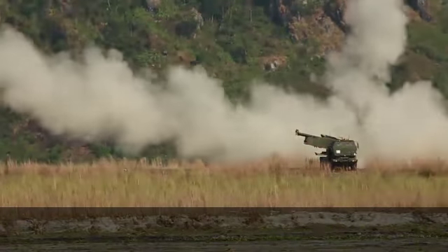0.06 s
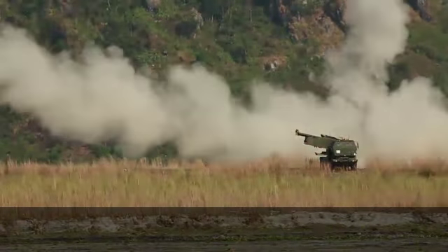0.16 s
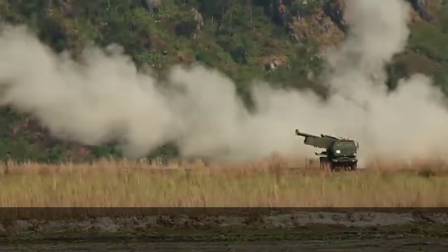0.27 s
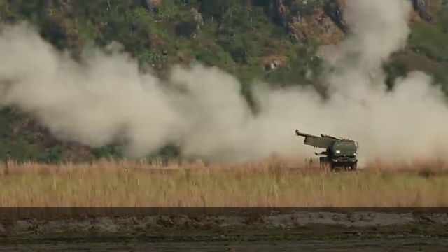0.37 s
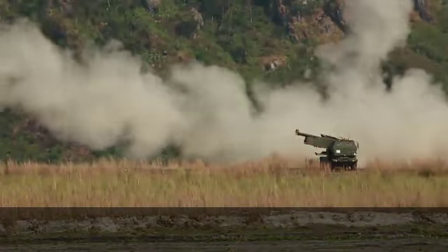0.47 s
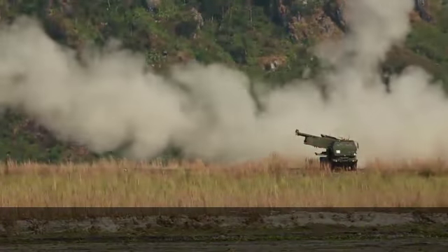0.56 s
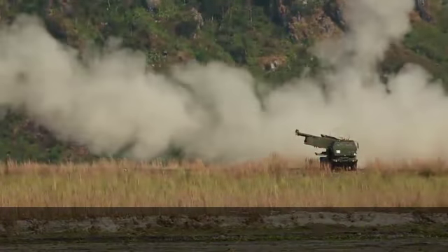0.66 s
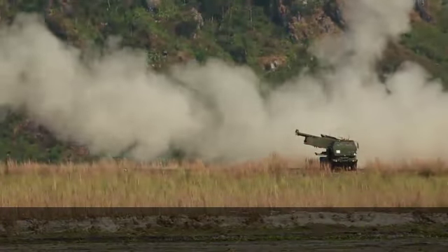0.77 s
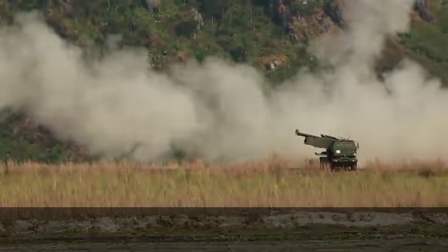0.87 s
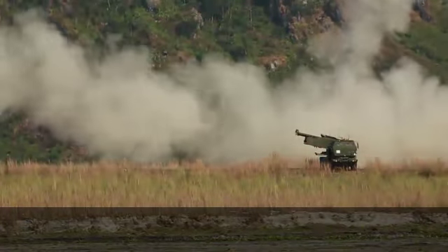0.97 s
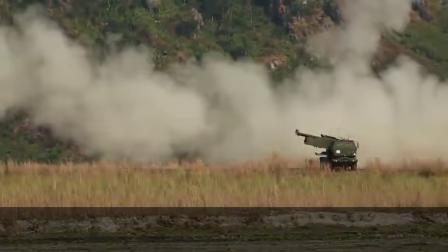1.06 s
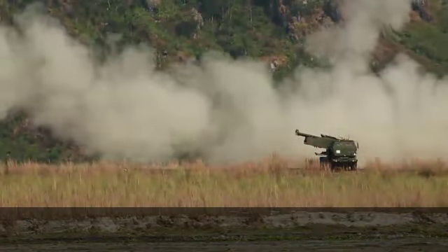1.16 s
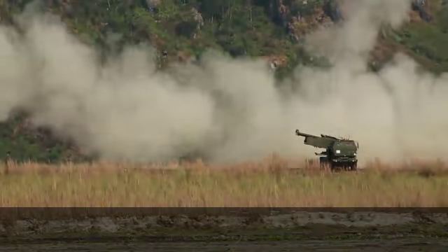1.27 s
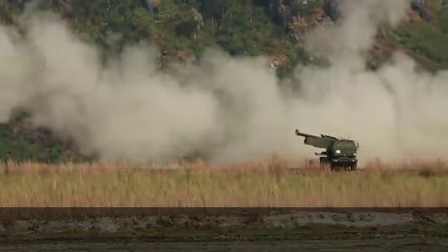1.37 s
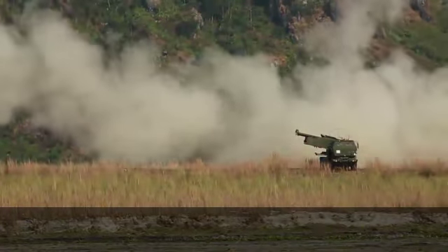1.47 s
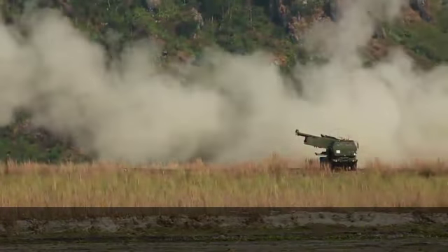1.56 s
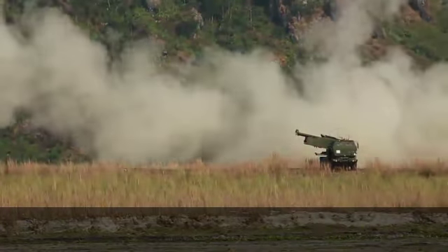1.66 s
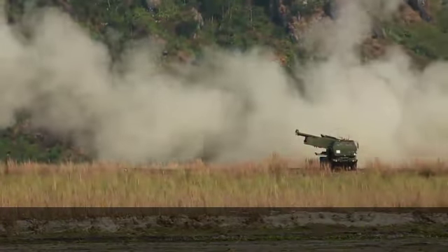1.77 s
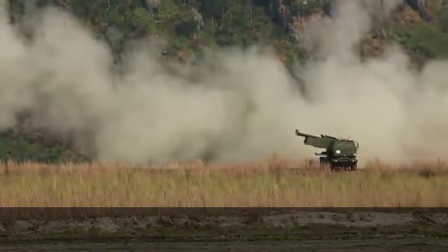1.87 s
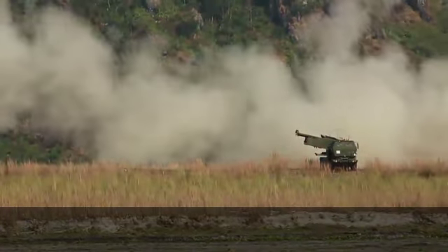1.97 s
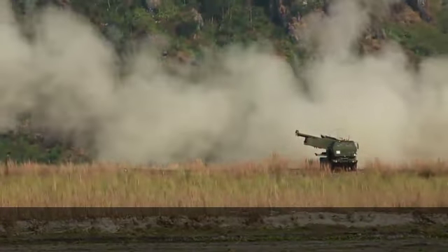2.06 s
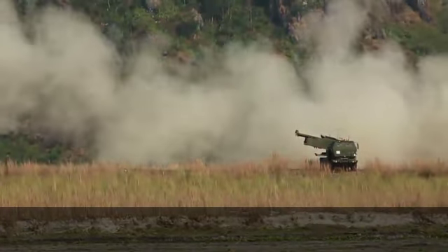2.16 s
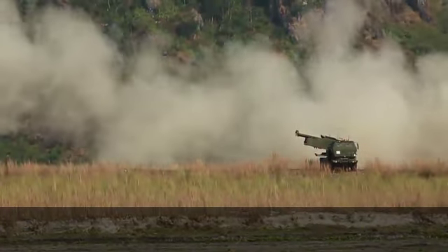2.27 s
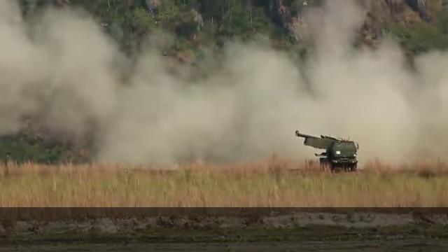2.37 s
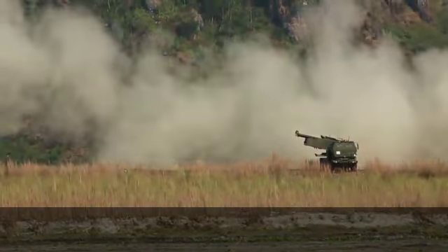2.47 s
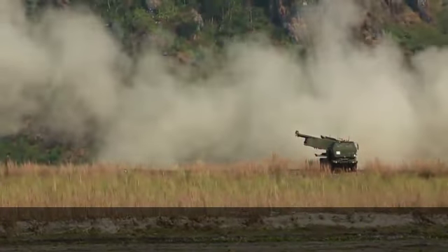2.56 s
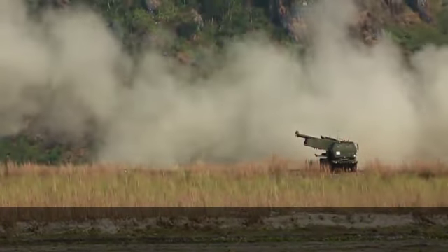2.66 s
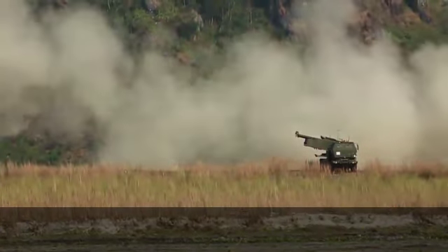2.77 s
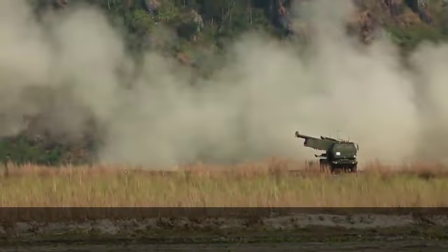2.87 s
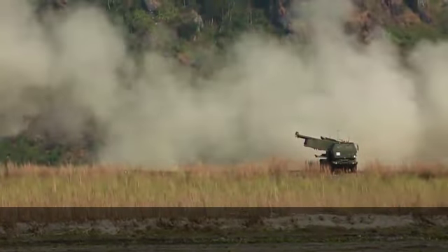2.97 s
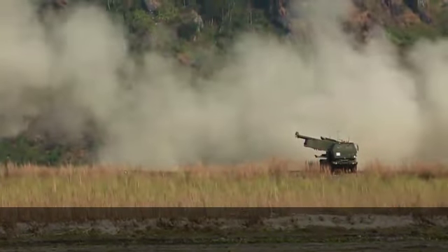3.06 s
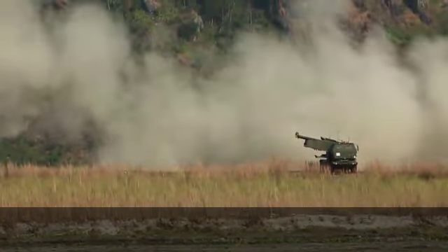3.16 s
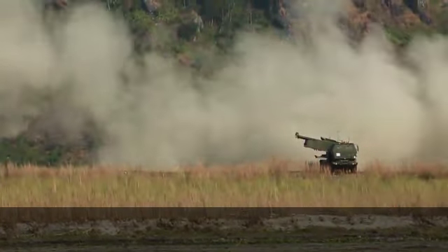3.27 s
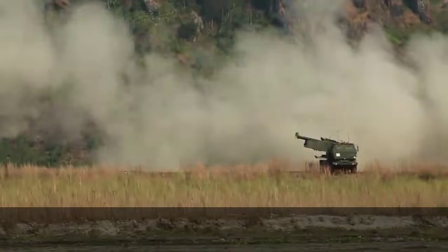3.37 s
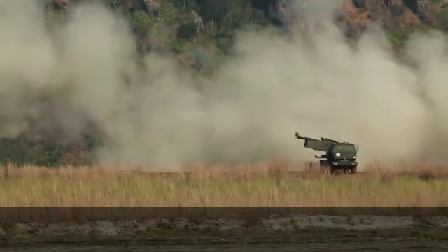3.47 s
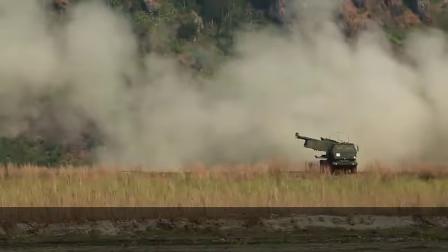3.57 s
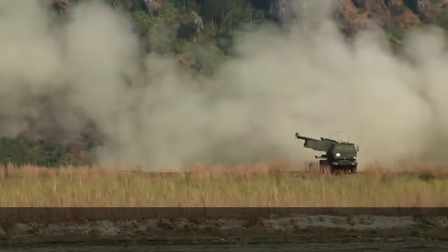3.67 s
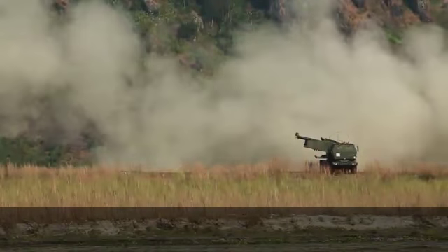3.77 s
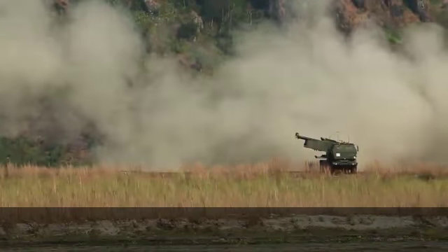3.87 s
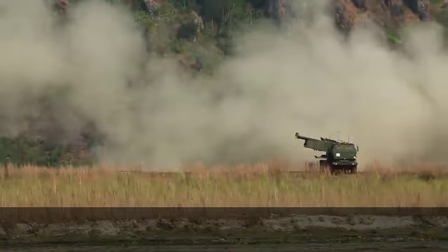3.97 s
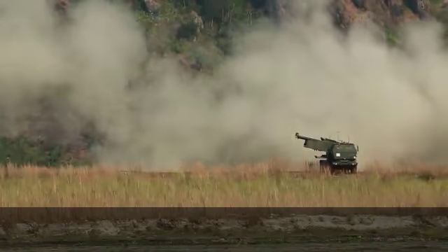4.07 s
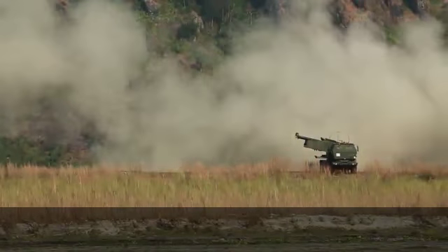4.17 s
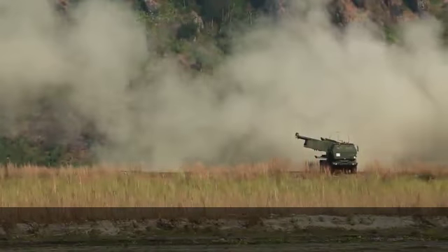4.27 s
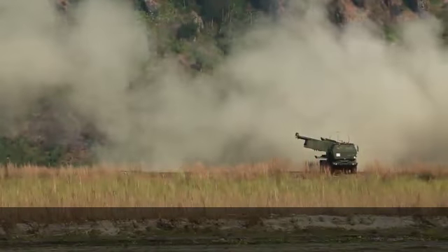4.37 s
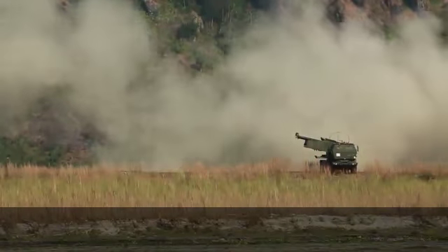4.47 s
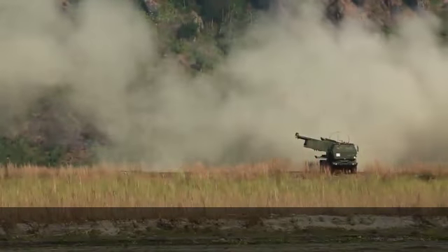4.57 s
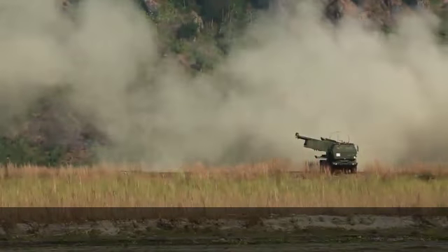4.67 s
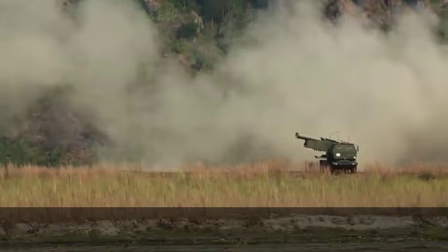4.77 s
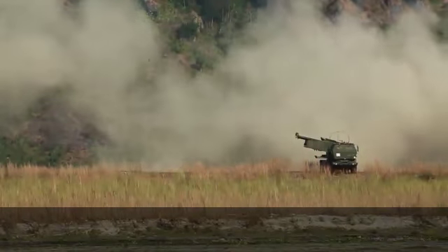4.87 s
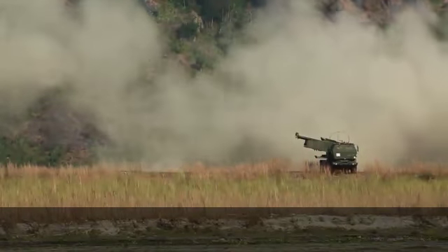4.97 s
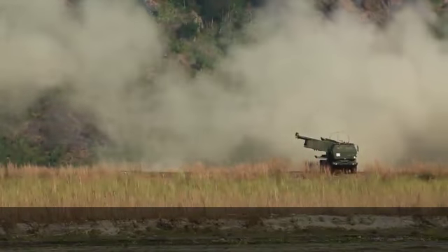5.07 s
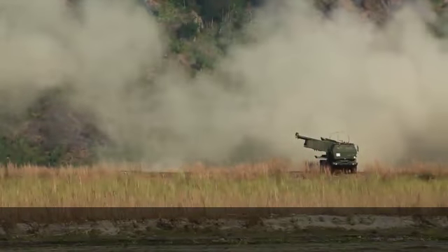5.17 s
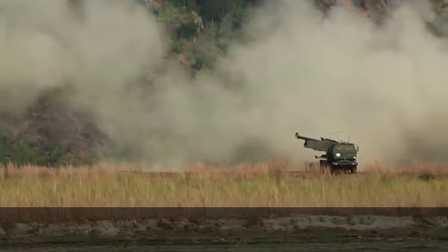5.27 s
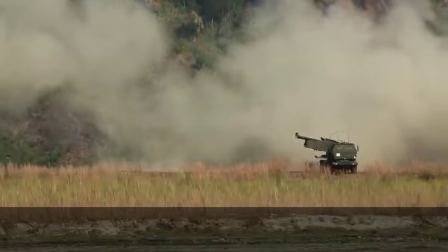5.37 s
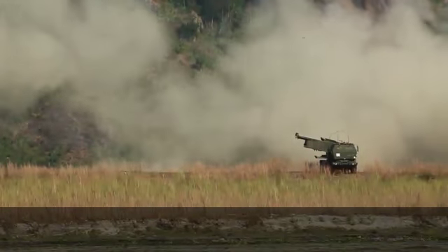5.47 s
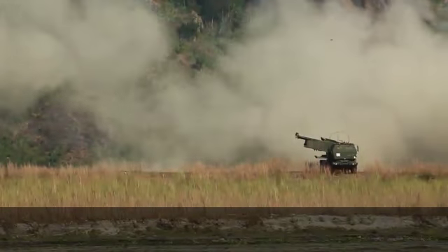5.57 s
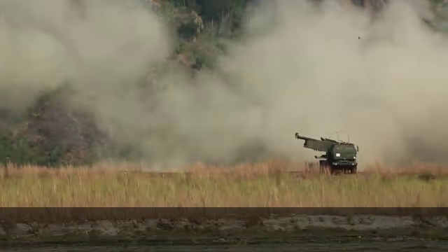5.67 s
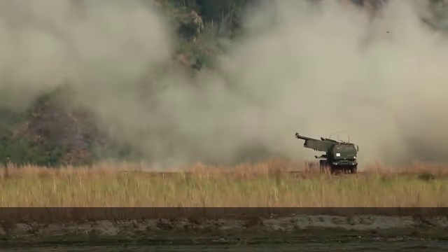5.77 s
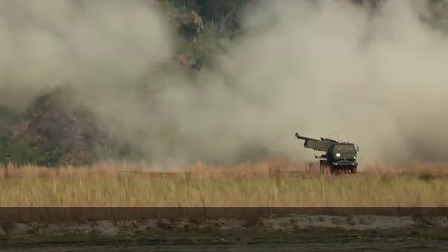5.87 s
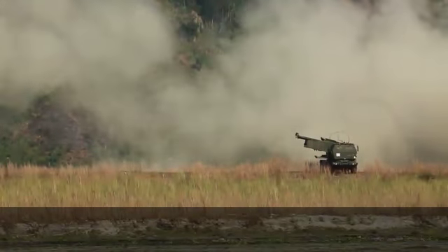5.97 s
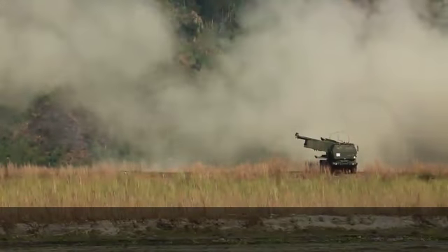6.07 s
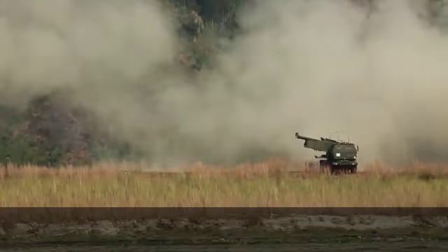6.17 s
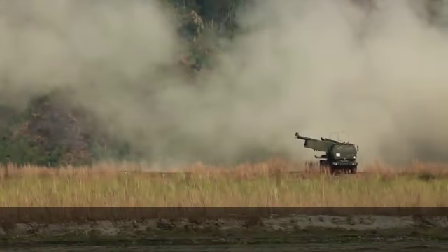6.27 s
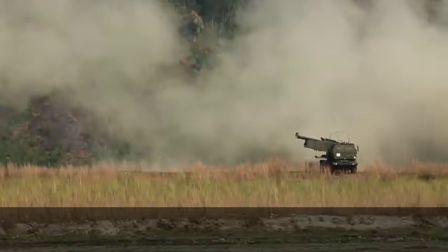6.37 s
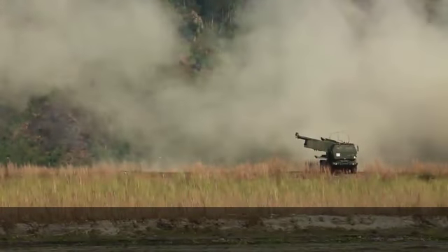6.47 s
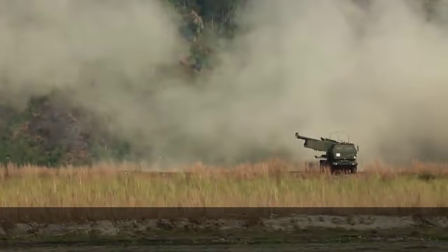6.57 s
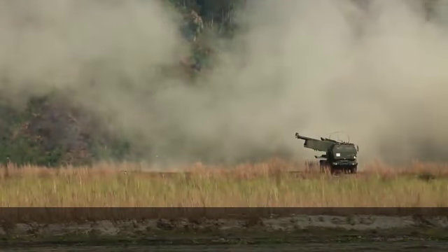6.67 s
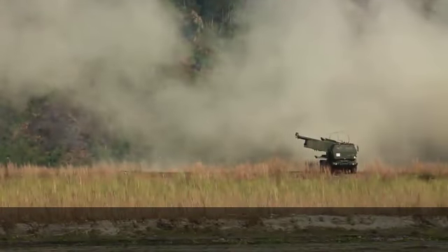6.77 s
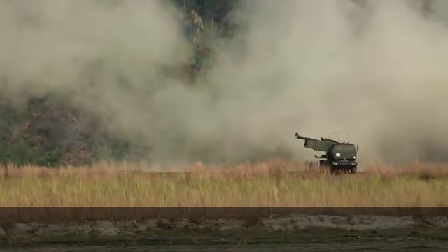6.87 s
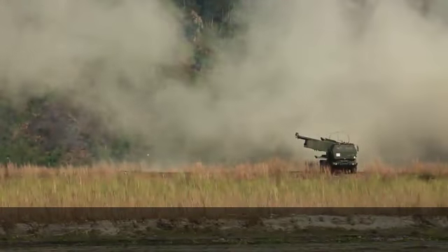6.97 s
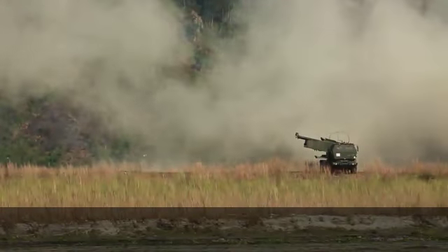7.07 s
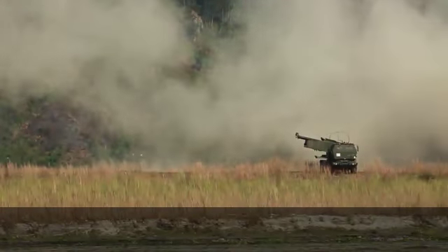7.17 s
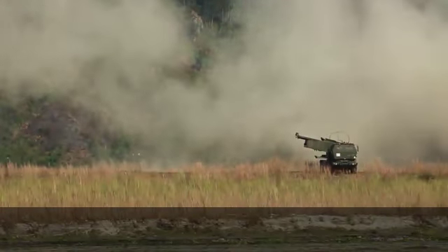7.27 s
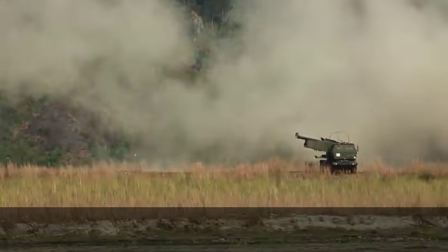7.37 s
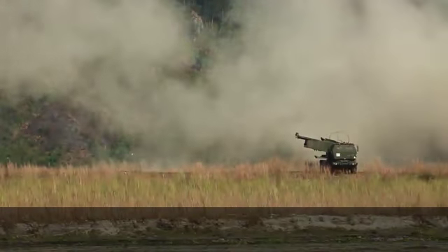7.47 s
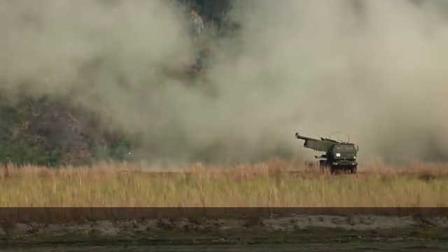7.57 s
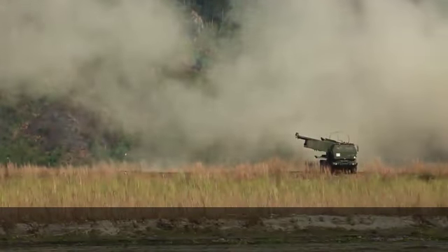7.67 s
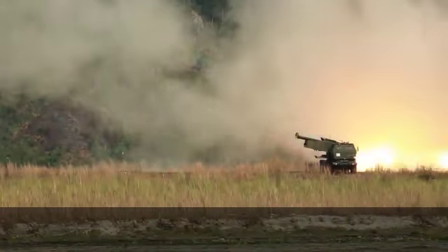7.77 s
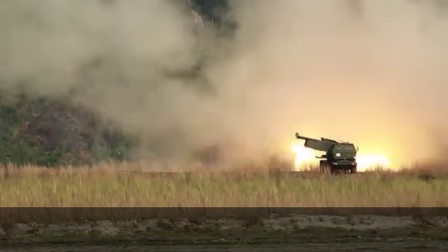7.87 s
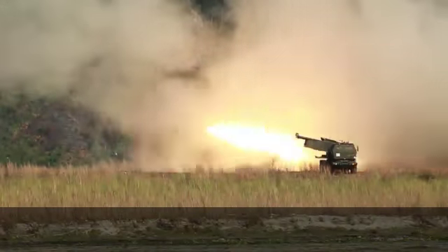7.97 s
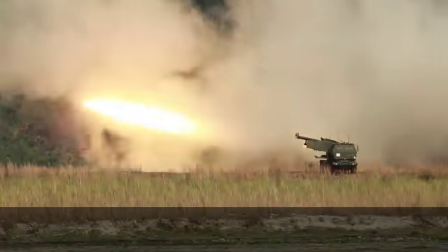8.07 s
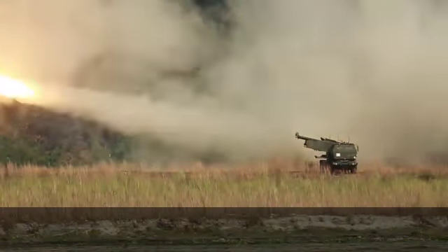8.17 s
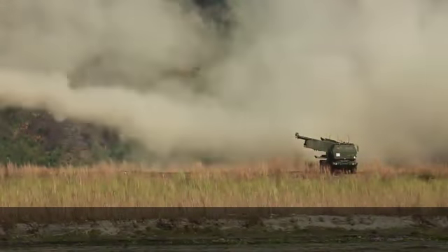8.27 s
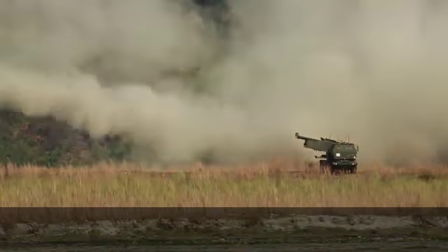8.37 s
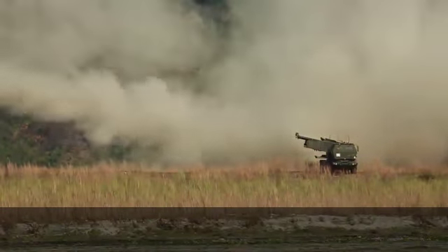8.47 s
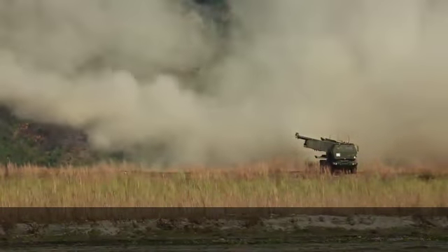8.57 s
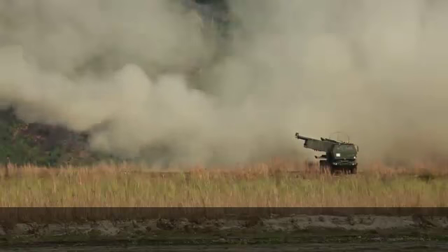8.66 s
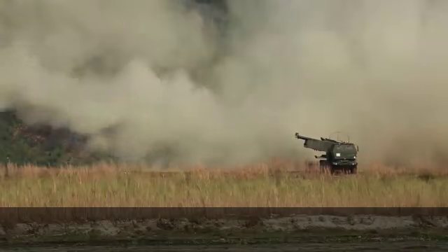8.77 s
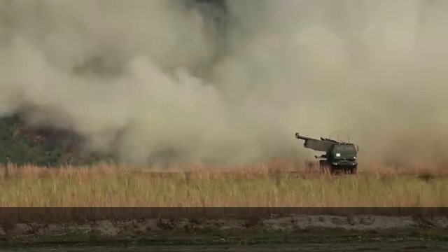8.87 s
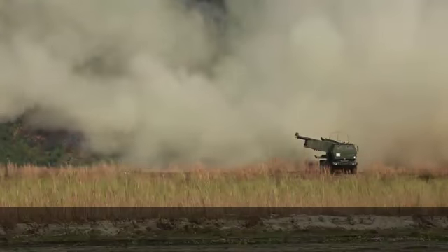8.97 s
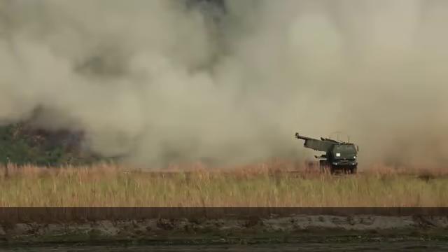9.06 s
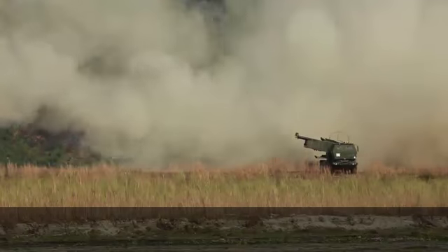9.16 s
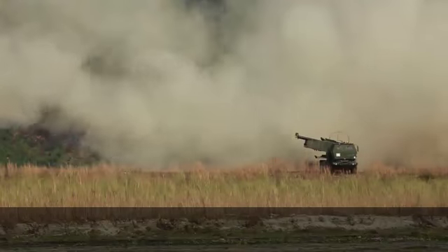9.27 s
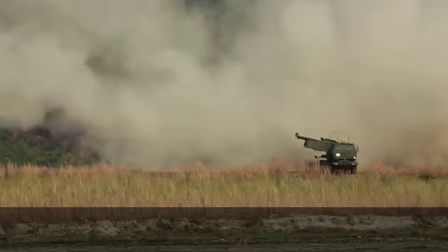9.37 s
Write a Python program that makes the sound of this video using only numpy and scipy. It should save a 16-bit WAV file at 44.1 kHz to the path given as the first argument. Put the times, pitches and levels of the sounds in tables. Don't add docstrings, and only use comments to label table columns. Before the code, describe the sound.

An open grass field, heard in mono at some distance from a truck-mounted rocket launcher. At 0 seconds a rocket is already roaring, broad, harsh and saturating the microphone, with deep rumble and a short ground echo. Its bright tearing tone lowers quickly over the first half second. From about 1.2 it weakens in jerks, with crackling peals; after 1.7 it turns duller and more distant, swelling in gusts until around 4, gone by about 5.3. Tiny high falling bird chips appear from 3.2 to 7.5, very faint. From 4.5 to 8.6 a far diesel idles softly, with irregular dry panel rattles, the strongest near 5.3 and 7.6, over low field murmur and slight hiss. At 8.7 a sudden double ignition thump hits, then a hard slap at 8.85, and a bright, crackling roar swells into heavy distortion, dropping in pitch, still loud at the end.

```python
import sys
import numpy as np
from scipy import signal
from scipy.fft import rfft, irfft, next_fast_len
from scipy.io import wavfile
from scipy.ndimage import uniform_filter1d, map_coordinates

SR = 44100
rng = np.random.default_rng(int(sys.argv[2]) if len(sys.argv) > 2 else 0)


def natural_amplitude(level_db):
    exponent = np.asarray(level_db, float) / 20
    return 10 ** exponent


def materialize(psi):
    bounded = np.clip(np.atleast_2d(psi).T, -1, 1)
    quanta = np.round(bounded * 32767).astype(np.int16)
    wavfile.write(sys.argv[1], SR, quanta)


N = 415863

# frequency [Hz], density [dB per Hz].
FIELD = [(18, -39.5), (30, -15.5), (86, -7.5), (137, -3), (267, -4), (395, -0.5), (469, -2.5), (531, -1),
         (767, -3.5), (1560, -4), (1860, -6.5), (3190, -19.5), (8930, -41.5), (10600, -41.5), (13800, -87),
         (22000, -120)]
# frequency [Hz], density [dB per Hz].
HISS = [(2500, -37), (4500, 7.5), (8000, 4), (10700, -6)]

# start [s], level [dB], starting pitch [Hz], length [s].
CHIPS = [(3.19, -67, 6780, .04), (3.526, -64.5, 7200, 0.012), (3.613, -59, 6970, 0.017),
         (3.705, -63.5, 6980, 0.017), (4.042, -69, 6560, 0.044), (4.178, -65.5, 7090, .015),
         (4.276, -68, 6670, 0.013), (4.621, -71, 6580, .035), (4.84, -64, 7100, 0.018),
         (4.92, -66, 7130, 0.026), (5.139, -68, 7270, 0.086), (5.659, -71, 6730, 0.059),
         (5.784, -71, 6460, 0.0147), (6.481, -67, 6900, .016), (6.568, -72, 6880, .015),
         (7.181, -71.5, 6370, 0.029), (7.478, -70, 6680, .05)]
CHIP_END_HZ = 5870

# pitch [Hz], rms level [dB].
EXHAUST = [(145.3, -69), (220.7, -77), (387.6, -73), (538.3, -71.5), (678.3, -72.5)]
# centre [Hz], width [Hz], level [dB].
BLOCK = [(1410, 210, 5), (1570, 130, 9), (1845, 230, 6.5)]
# time [s], peak level [dB].
RATTLES = [(4.5042, -44), (4.584, -47), (4.7262, -40), (4.8325, -44), (4.8898, -40), (4.9337, -38),
           (4.9961, -46), (5.0954, -43), (5.2176, -43), (5.3209, -32.5), (5.3657, -48), (5.5848, -46),
           (5.6257, -47), (5.706, -37), (5.7668, -39), (5.8691, -45), (5.9105, -44), (5.9764, -37.5),
           (6.1365, -40), (6.1779, -40), (6.2687, -45), (6.4677, -46), (6.5491, -44), (6.5905, -45),
           (6.6932, -45.5), (6.7351, -47), (6.7765, -42.5), (6.8584, -39), (6.9023, -43), (7.003, -40),
           (7.1302, -49), (7.1866, -43), (7.2285, -41.5), (7.2684, -39.5), (7.3512, -46), (7.5977, -35),
           (7.7179, -38), (7.7593, -43.5), (7.9449, -40), (7.9813, -43.5), (8.0626, -45), (8.107, -43),
           (8.1444, -49), (8.3066, -38), (8.348, -44), (8.4098, -45.5), (8.4906, -39.5), (8.6353, -49)]
FIRING_HZ, IDLE_DB = 49.2, -63.5
RATTLE_DB, RATTLE_S, KNOCK_DB = -12.5, 0.015, 11

# frequency [Hz], density [dB per Hz].
JET = [(200, -35.5), (330, 4.5), (600, 0.5), (1200, -3.5), (2200, -9.5), (4000, -20.5), (7000, -31.5),
       (11000, -41.5)]
# frequency [Hz], density [dB per Hz].
RUMBLE = [(20, -41), (50, -14.5), (120, -1.5), (200, 3.5), (300, -1.5), (450, -54.5)]
# time [s], weight of the rumble [dB].
LAUNCHES = [
    (-.45, 3),
    (8.716, -1.5),
]
# time [s], roar level [dB].
ROAR = [
    [(0, -1.5), (.3, 1), (1.1, -7.5), (1.67, -12), (1.8, -20), (3.0, -30), (3.28, -39), (4.25, -47),
     (5.2, -57.5)],
    [(8.716, -20.5), (8.726, -13.5), (8.83, -11), (8.97, -5.5), (9.43, -0.5)],
]
# time [s], lag of the ground echo [ms],
# pitch of the jet's loudest band [Hz], sharpness of that band [dB].
PATHS = [
    [(0, .59, 1196, 5.5), (.11, 0.72, 1082, 5.5), (.2, .77, 848, 4), (.35, 1.02, 639, 2),
     (.5, 1.2, 559, 2.5), (.9, 1.49, 539, 0.5), (1.3, 1.7, 551.6, 2), (2, 1.75, 481, 0.5),
     (5.2, 1.8, 518, -2.5)],
    [(8.7, 0.63, 1654, 6), (8.85, 0.71, 1739, 7), (8.92, 0.71, 2123, 7), (9, .6, 1686, 6),
     (9.08, 0.36, 1499, 8), (9.15, .55, 1155, 6.5), (9.23, .67, 1046, 4), (9.31, .81, 901, 4),
     (9.43, .93, 845, 3.5)],
]
# time [s], change [dB], half-width [s].
GUSTS = [(.5, 3.5, 0.043), (1.245, -9.5, 0.03), (1.399, 0.5, 0.03), (1.521, -4.5, 0.044),
         (1.629, 1.5, 0.091), (1.921, 5, 0.048), (2.08, -1, 0.023), (2.269, 7, 0.031), (2.44, 3.5, 0.029),
         (2.75, -4, 0.046), (2.9, 4.5, 0.061), (3.09, 1, 0.035), (3.5, 7.5, 0.11), (3.7, 8, .09),
         (3.86, 3, 0.15), (3.97, 6.5, 0.13), (8.8507, -7.5, .003), (8.84, -4, .02), (.35, -2.5, .02),
         (.88, -1, .03), (1.14, -2, .02), (1.31, 0, .03), (1.35, -6, .015), (2.36, -2, .03), (2.55, 0, .02),
         (2.61, -0.5, .025), (2.69, 3, .02), (3.421, -0.5, .03), (3.62, -4, .012), (3.78, 0.5, .02),
         (3.985, 1.5, .025), (4.06, 0, .02), (4.35, 2.5, .04)]
# start [s], peak level [dB].
PEALS = [(1.311, -15), (1.38, -22), (1.63, -13), (1.67, -24), (1.849, -25), (1.955, -35), (2.047, -22.5),
         (2.11, -41), (2.148, -20.5), (2.274, -30), (2.297, -34), (2.409, -34), (2.45, -27), (2.539, -27),
         (2.609, -21.5), (2.867, -30), (2.929, -43), (3.08, -31.5), (3.468, -45), (3.596, -33), (3.63, -37),
         (3.699, -30.5), (3.759, -51), (3.9, -44), (3.97, -37)]
# time [s], level [dB], tube pitch [Hz], 60 dB decay [s].
BOOMS = [
    (8.7155, -6.5, 90, .03),
    (8.7266, -4.5, 148, .09),
]

EXIT_S, EXIT_DB, EXIT_FALL_S = 8.8492, -2.5, 0.0018
STEEP, STEEPEN_S = 1.6, 0.53
SOFTEN_S, EDDY_DB = 0.98, 1.97
BURNOUT_S, BURNOUT_DB, DULL_DB_PER_S = 2.137, 6.5, 2
TREBLE_DB = -6
YOUNG_DB, YOUNG_S, YOUNG_WIDTH_S = 4.5, 0.046, 0.3
AIR_DB, AIR_HZ = 3, 8030
GLINT, PEAL_GLINT_DB, GLINT_FADE_S = 0.21, 6, 0.97
PEAL_S, PEAL_SPREAD = 0.01, 0.59
ECHO, FAR_ECHO, ECHO_S = 0.2, 0.52, 0.38
ECHO_TOP_HZ, ECHO_WAVER_MS = 2600, 0.09
RUMBLE_DB, RUMBLE_RISE_DB, RUMBLE_RISE_S = -10.5, 10, 0.56
RUMBLE_HOLD_S, RUMBLE_FALL_DB = 1.42, 33
BACKWASH_DB, BACKWASH_S, BACKWASH_WIDTH_S = 13.5, 0.88, 0.057

PORT_SHARE, PORT_S = 0.6, 0.0018
TOP_UP, TOP_DOWN = 0.47, 0.61
TOP_HZ = 10850


def unit(x):
    return x / np.sqrt(np.mean(x ** 2) + 1e-20)


def along(points, hz):
    f, v = np.transpose(points)
    return np.interp(np.log(hz + 1), np.log(f + 1), v)


def curves(rows, t):
    s, *cols = np.transpose(rows)
    return [np.interp(t, s, c) for c in cols]


def settle(start, end, age, span):
    return end + (start - end) * np.exp(-(age / span) ** 2)


def wobble(rate):
    return map_coordinates(rng.standard_normal(int(N * rate / SR) + 4), [np.arange(N) * rate / SR])


def patches(shape, bins, frames):
    field = uniform_filter1d(rng.standard_normal(shape), bins, axis=0)
    return unit(uniform_filter1d(field, frames, axis=1))


def filtered(x, response):
    m = next_fast_len(N + 8192)
    return irfft(rfft(x, m) * response(np.fft.rfftfreq(m, 1 / SR)), m)[..., :N]


def rush(spectrum, patchy_db):
    z = signal.stft(rng.standard_normal(N), nperseg=512)[2]
    white = signal.istft(z * natural_amplitude(patchy_db * patches(z.shape, 6, 10)), nperseg=512)[1][:N]
    return unit(filtered(white, lambda hz: natural_amplitude(along(spectrum, hz))))


def field():
    murmur = natural_amplitude(0.6 * wobble(5)) * rush(FIELD, patchy_db=1.1)
    return natural_amplitude(-54) * murmur + natural_amplitude(-79.5) * rush(HISS, patchy_db=0.9)


def bird():
    out = np.zeros(N)
    for s, db, start_hz, length in CHIPS:
        count = int(length * SR)
        u = np.arange(count) / count
        pitch = CHIP_END_HZ + (start_hz - CHIP_END_HZ) * (1 - u) ** 1.5
        pitch = pitch + 1500 * rng.standard_normal(count)
        whistle = np.sin(np.pi * u) * np.sin(2 * np.pi * np.cumsum(pitch) / SR)
        out[round(s * SR):][:count] += natural_amplitude(db - 1.5) * whistle
    smear = rng.standard_normal(SR // 20) * natural_amplitude(-60 * np.arange(SR // 20) / SR / 0.06)
    return out + 0.46 * signal.fftconvolve(out, smear / np.linalg.norm(smear))[:N]


def block(f):
    return sum((-1) ** k * natural_amplitude(db) * 1j * f * width / (centre ** 2 - f ** 2 + 1j * f * width)
               for k, (centre, width, db) in enumerate(BLOCK))


def diesel():
    t = np.arange(N) / SR
    turn = FIRING_HZ * t + 0.13 * wobble(1.3)
    blows = natural_amplitude(1.8 * rng.standard_normal(int(FIRING_HZ * N / SR) + 9))
    blow = blows[np.maximum(turn, 0).astype(int)]
    gated = rng.standard_normal(N) * (0.4 + blow * np.exp(-3.5 * (turn % 1)))
    mechanical = unit(filtered(
        gated, lambda f: block(f) ** 2 + 0.08 * f / (f + 900) / (1 + (f / 3500) ** 2)))
    shaken = sum(natural_amplitude(db + RATTLE_DB) * (t > s) * np.exp(-np.abs(t - s) / RATTLE_S) for s, db in RATTLES)
    clatter = (natural_amplitude(IDLE_DB + 4.3 * wobble(30)) + shaken) * mechanical
    tones = sum(natural_amplitude(db + 5.5 + 2.0 * wobble(14)) * np.sin(2 * np.pi * hz * t + 1.2 * wobble(9.8))
                for hz, db in EXHAUST)
    starts = [round(s * SR) for s, db in RATTLES]
    knocks = np.bincount(starts, [natural_amplitude(db + KNOCK_DB) for s, db in RATTLES], N)
    return clatter + tones + filtered(knocks, lambda f: block(f) / (1 + 1j * f / 2400) ** 2)


def booms():
    out, t = np.zeros(N + SR), np.arange(SR // 4) / SR
    for s, db, hz, t60 in BOOMS:
        front = (1 - t / 0.00085) * np.exp(-t / 0.00086) * (1 - np.exp(-t / 0.00014))
        ring = -0.6 * np.sin(2 * np.pi * hz * t) * natural_amplitude(-60 * t / t60)
        out[round(s * SR):][:len(t)] -= natural_amplitude(db) * (front + ring)
    out[round(EXIT_S * SR):][:len(t)] += natural_amplitude(EXIT_DB) * (1 - t / 0.006) * np.exp(-t / EXIT_FALL_S)
    return out[:N]


def peal_shapes(t):
    lengths = [PEAL_S * (1 + PEAL_SPREAD * max(s - 2, 0)) for s, db in PEALS]
    return [np.exp(-((t - s - PEAL_S / 2) / length) ** 2) for (s, db), length in zip(PEALS, lengths)]


def crackle(t):
    swell = sum(natural_amplitude(db) * shape for (s, db), shape in zip(PEALS, peal_shapes(t)))
    snaps = (rng.random(N) < 0.014) * -natural_amplitude(2.3 * rng.exponential(size=N))
    fronts = swell * unit(filtered(snaps, lambda f: 1j * f / (1 + 1j * f / 2600) ** 2 / 2600))
    hz, frames, z = signal.stft(fronts, SR, nperseg=256)
    air_db = -11 * np.outer((hz / 4100) ** 3.9, np.maximum(frames - 1.2, 0))
    return signal.istft(z * natural_amplitude(air_db), SR, nperseg=256)[1][:N]


def flight(t):
    start, weight_db = np.transpose(LAUNCHES)[:, (t >= BOOMS[0][0]).astype(int)]
    age = t - start
    spent = age - BURNOUT_S
    coasting_s = np.clip(spent, 0, 2)
    peals = sum(peal_shapes(t)) * np.exp(-np.maximum(spent, 0) / GLINT_FADE_S)
    burnout_db = BURNOUT_DB - PEAL_GLINT_DB * np.minimum(peals, 1)
    faded_db = burnout_db * (1 + np.tanh(spent / 0.12)) / 2 + DULL_DB_PER_S * coasting_s
    young_db = YOUNG_DB * np.exp(-((age - YOUNG_S) / YOUNG_WIDTH_S) ** 2)
    treble_db = TREBLE_DB + young_db - faded_db
    rumble_db = RUMBLE_DB + weight_db - settle(RUMBLE_RISE_DB, 0, age, RUMBLE_RISE_S)
    rumble_db = rumble_db - RUMBLE_FALL_DB * np.log10(1 + (age / RUMBLE_HOLD_S) ** 3)
    rumble_db = rumble_db + BACKWASH_DB * np.exp(-((age - BACKWASH_S) / BACKWASH_WIDTH_S) ** 2)
    lag_ms, pitch_hz, sharp_db = curves(np.concatenate(PATHS), t)
    strength, steep = settle(ECHO, FAR_ECHO, age, ECHO_S), settle(0, STEEP, age, STEEPEN_S)
    return lag_ms, strength, pitch_hz, sharp_db, treble_db, rumble_db, coasting_s, steep


def receding(x, t, pitch_hz, sharp_db):
    hz, frames, z = signal.stft(x, SR, nperseg=512)
    octaves = np.log2((hz[:, None] + 1) / np.interp(frames, t, pitch_hz))
    band = np.exp(-(octaves / 0.69) ** 2) - (1 - np.tanh(octaves / 0.5 + 2)) / 2
    gain = natural_amplitude(np.interp(frames, t, sharp_db) * band)
    shaped_power = uniform_filter1d(np.sum(np.abs(z * gain) ** 2, 0), size=41)
    power = uniform_filter1d(np.sum(np.abs(z) ** 2, 0), size=41)
    gain = gain / np.sqrt(shaped_power / power)
    return signal.istft(z * gain, SR, nperseg=512)[1][:N]


def shocked(x, steep, skew):
    peaked = x - skew * (x ** 2 - 1)
    return unit(map_coordinates(peaked, [np.arange(N) - steep * x], mode="nearest"))


def through_air(jet, t, treble_db, coasting_s):
    hz, frames, z = signal.stft(jet, SR, nperseg=256)
    coasting = np.interp(frames, t, coasting_s)
    z = z * natural_amplitude(EDDY_DB * patches(z.shape, 6, 24) * np.minimum(coasting, 1))
    slope = (np.maximum(hz - 900, 0) / 3300) ** 1.4
    tilt_db = np.minimum(np.outer(slope, np.interp(frames, t, treble_db) + 7), 12)
    air_db = AIR_DB * np.outer((hz / AIR_HZ) ** 3, coasting)
    low_cut = (hz ** 2 / (hz ** 2 + 170 ** 2))[:, None]
    return signal.istft(z * natural_amplitude(tilt_db - air_db) * low_cut, SR, nperseg=256)[1][:N]


def ground_echo(direct, lag_ms, coasting_s):
    waver_ms = ECHO_WAVER_MS * np.minimum(coasting_s, 1) * wobble(60)
    echo = map_coordinates(direct, [np.arange(N) - (lag_ms + waver_ms) * SR / 1000], order=1)
    return filtered(echo, lambda f: 1 / np.sqrt(1 + (f / ECHO_TOP_HZ) ** 2))


def rocket():
    t = np.arange(N) / SR
    gust_db = sum(db * np.exp(-((t - s) / width) ** 2) for s, db, width in GUSTS)
    roar_db = curves(np.concatenate(ROAR), t)[0] + gust_db
    roar_db = roar_db + 0.45 * np.maximum(roar_db + 7.5, 0)
    burning = np.clip((5.3 - t) / 0.26, 0, 1) + (t > BOOMS[0][0])
    lag_ms, strength, pitch_hz, sharp_db, treble_db, rumble_db, coasting_s, steep = flight(t)
    jet = receding(rush(JET, patchy_db=1.45), t, pitch_hz, sharp_db)
    jet = shocked(jet, steep=steep * np.exp(-coasting_s / SOFTEN_S), skew=0.15)
    jet = through_air(jet, t, treble_db + GLINT * gust_db, coasting_s)
    direct = natural_amplitude(roar_db + 0.63 * wobble(30)) * jet + natural_amplitude(-2) * crackle(t)
    echo = ground_echo(direct, lag_ms, coasting_s)
    both = (direct + strength * echo) / np.sqrt(1 + strength ** 2)
    heave_db = rumble_db + 0.34 * gust_db + 1.5 * wobble(14)
    return burning * (both + natural_amplitude(heave_db) * rush(RUMBLE, patchy_db=0.5))


def scene():
    return (field() + bird() + diesel() + booms() + rocket())[None]


def band_limit(x):
    return signal.sosfilt(signal.butter(12, 10760, fs=SR, output="sos"), x)


def record(dry):
    lag = np.arange(round(0.004 * SR)) / SR
    scatter = rng.standard_normal(len(lag)) * np.exp(-lag / PORT_S)
    scatter = scatter[None] / np.linalg.norm(scatter)
    side = PORT_SHARE * signal.fftconvolve(dry, scatter, axes=1)[:, :N]
    ports, knee = np.array([dry + side, dry - side]), 5
    limit = np.where(ports > 0, TOP_UP, TOP_DOWN)
    clipped = np.mean(ports / (1 + np.abs(ports / limit) ** knee) ** (1 / knee), axis=0)
    mix = filtered(clipped, lambda hz: (1 + 0.2 * 1j * hz / (1200 + 1j * hz)) * (hz < TOP_HZ))
    return band_limit(mix)


dry = scene()
out = record(dry)
materialize(out)
```